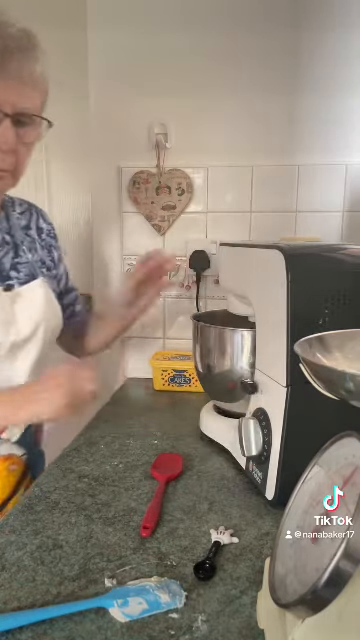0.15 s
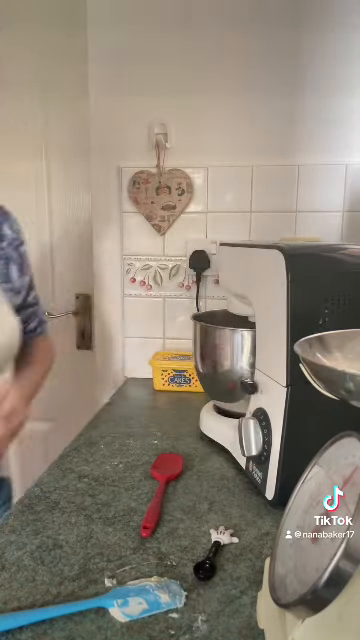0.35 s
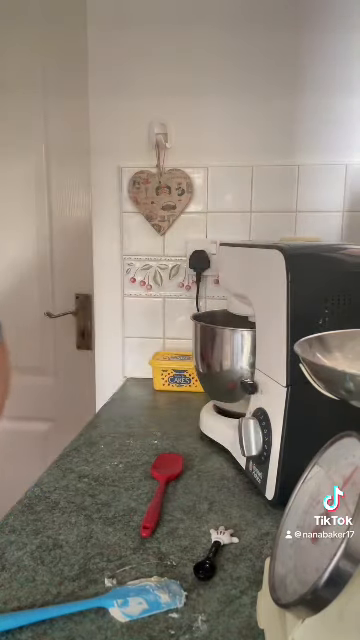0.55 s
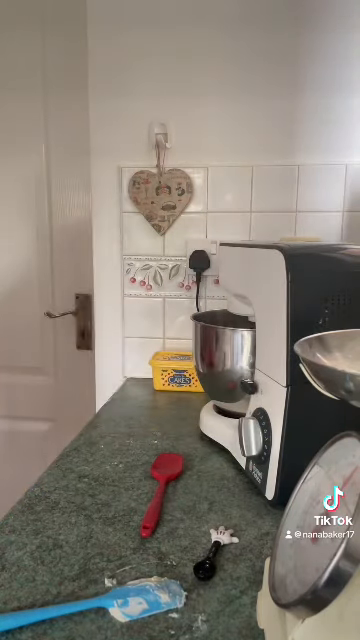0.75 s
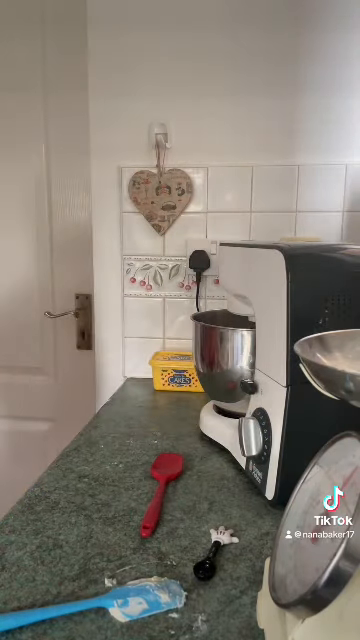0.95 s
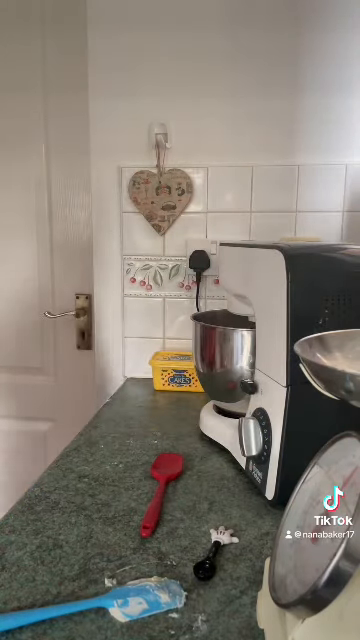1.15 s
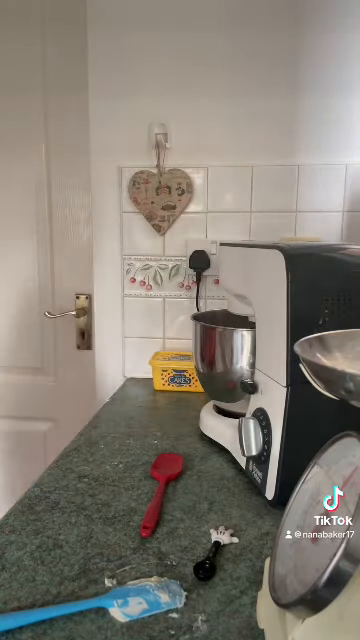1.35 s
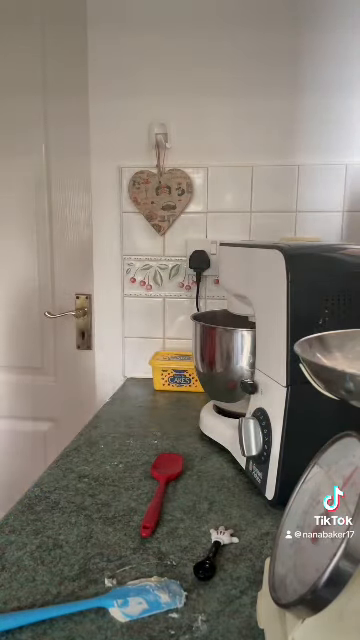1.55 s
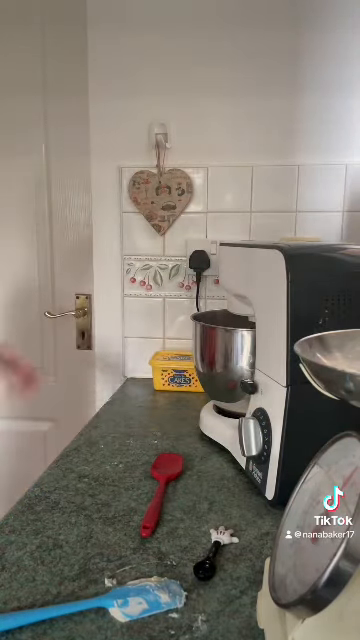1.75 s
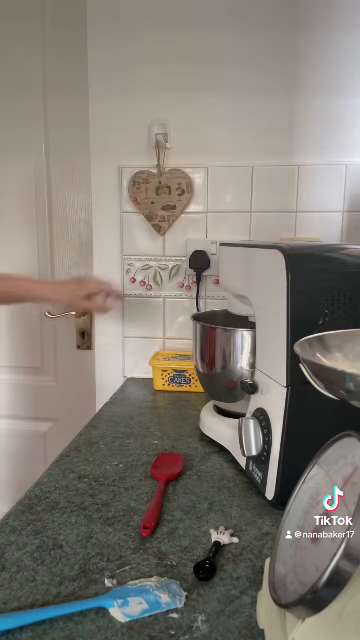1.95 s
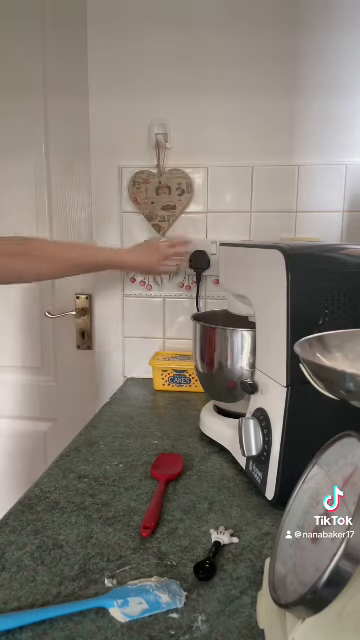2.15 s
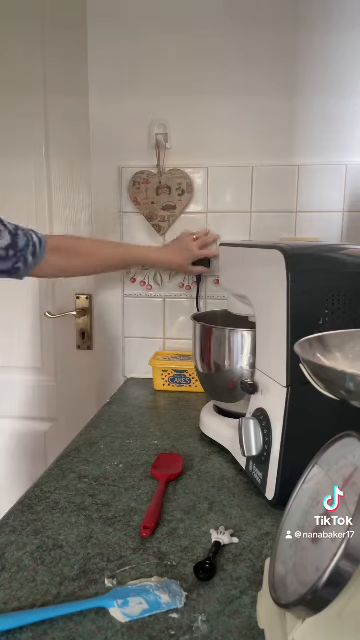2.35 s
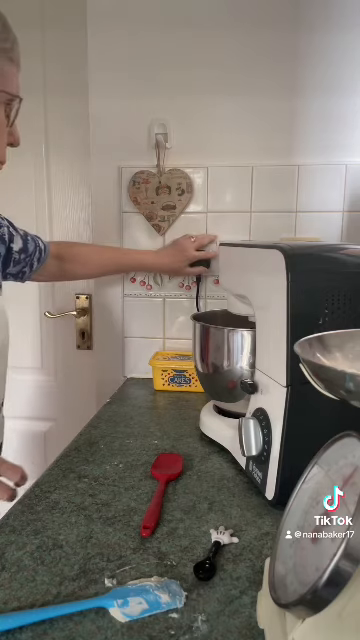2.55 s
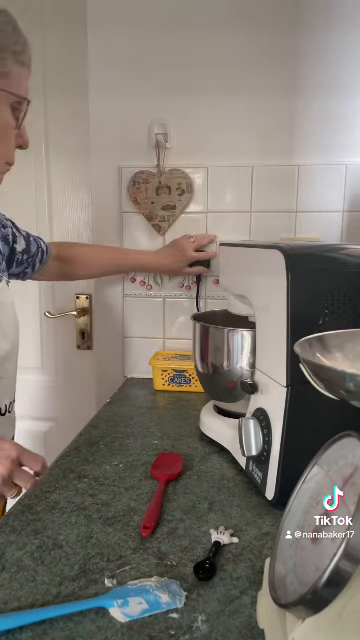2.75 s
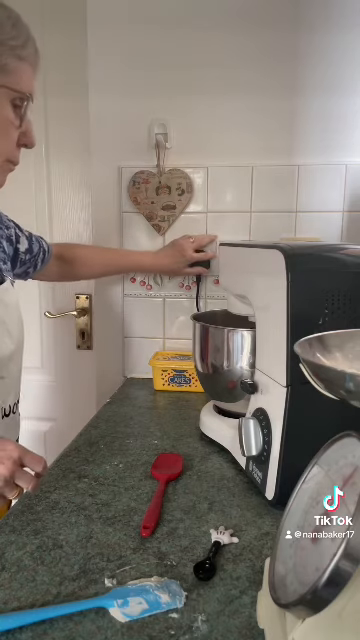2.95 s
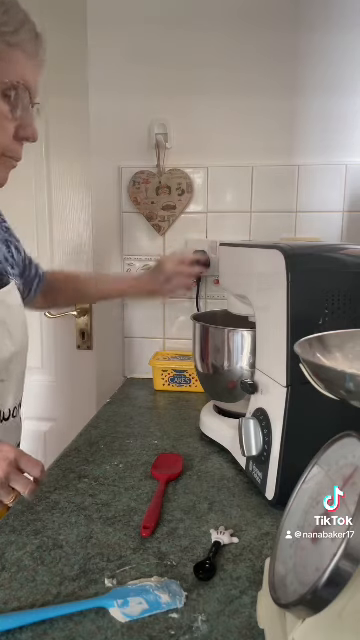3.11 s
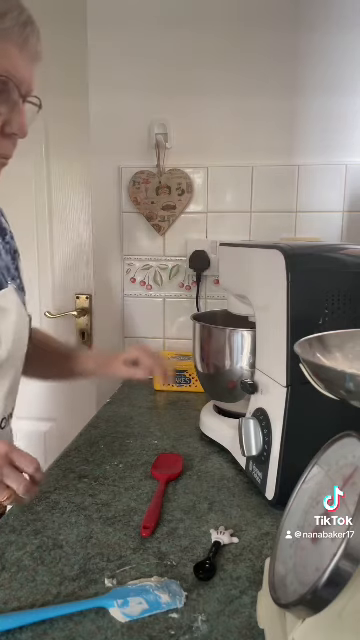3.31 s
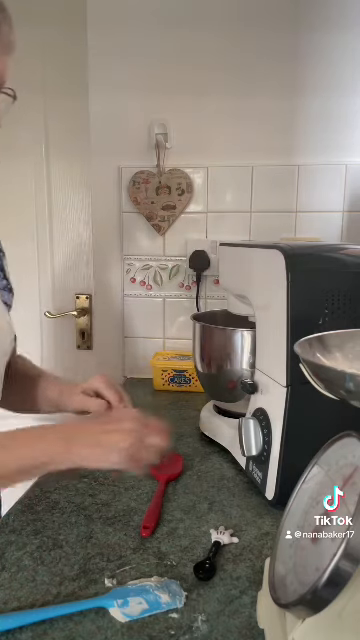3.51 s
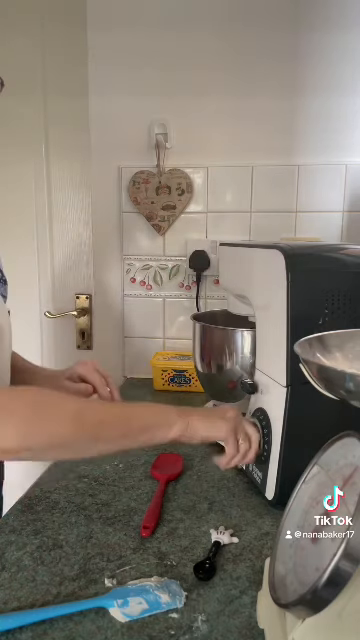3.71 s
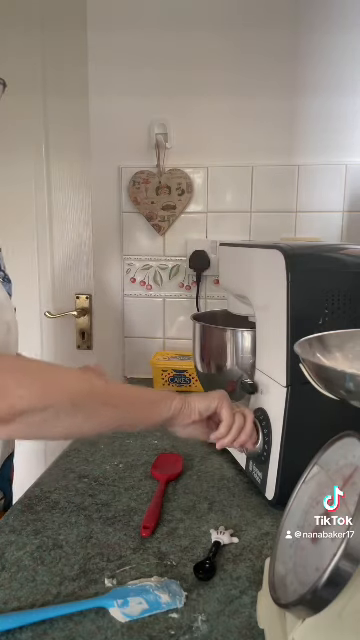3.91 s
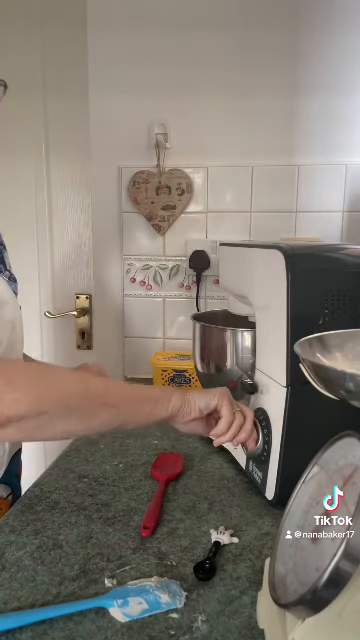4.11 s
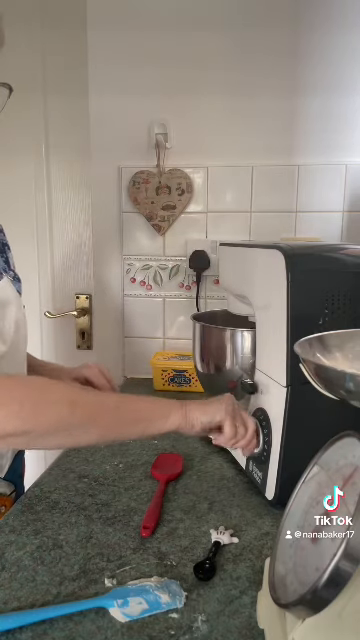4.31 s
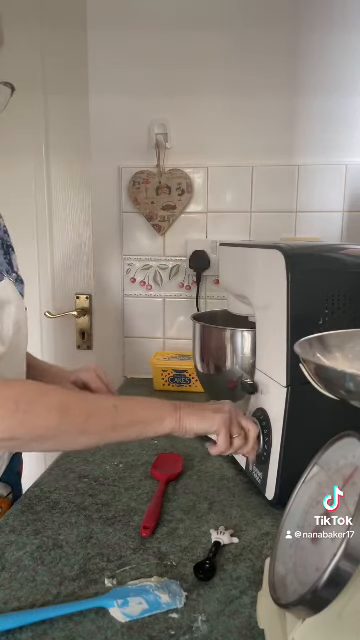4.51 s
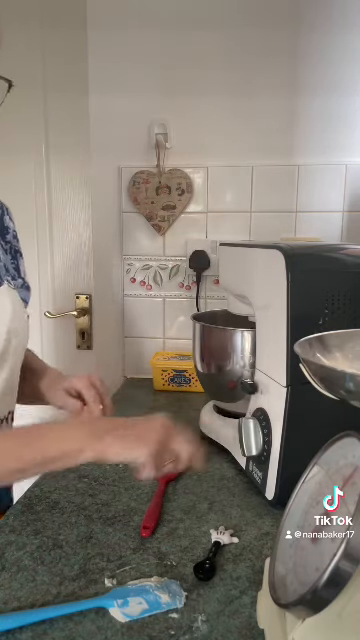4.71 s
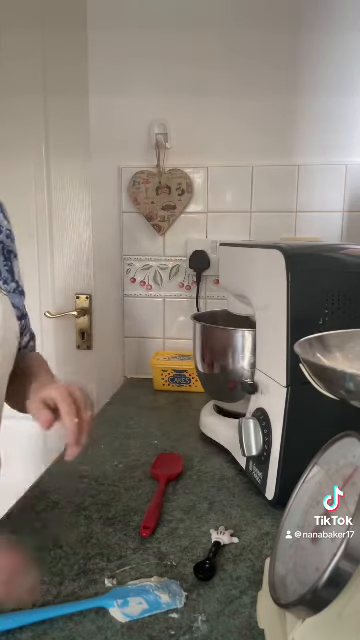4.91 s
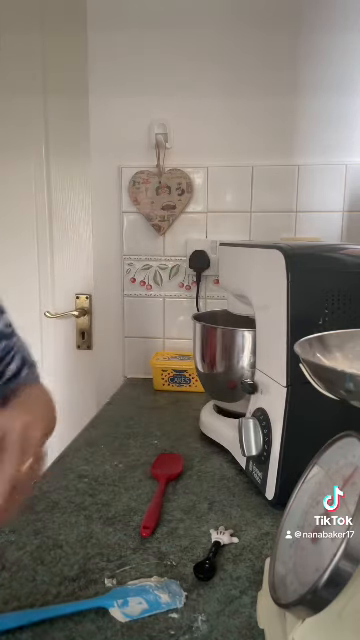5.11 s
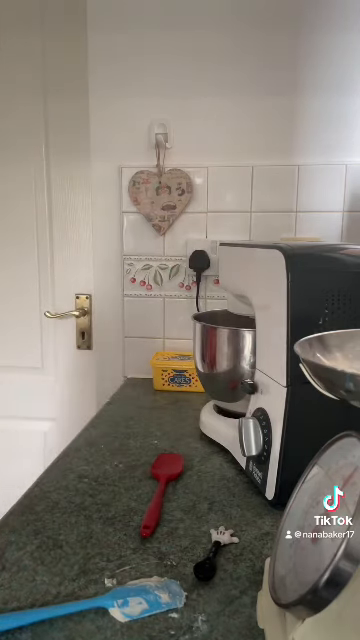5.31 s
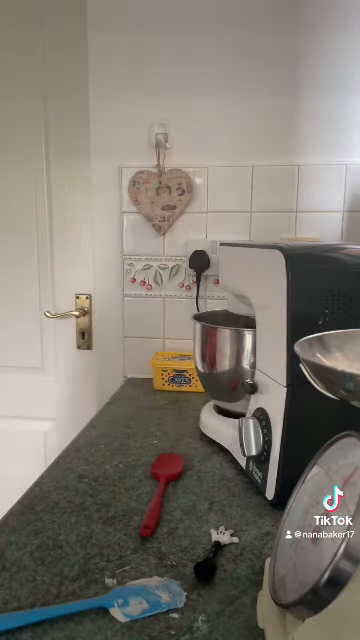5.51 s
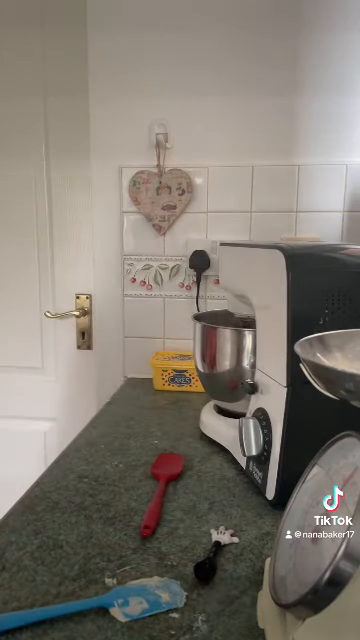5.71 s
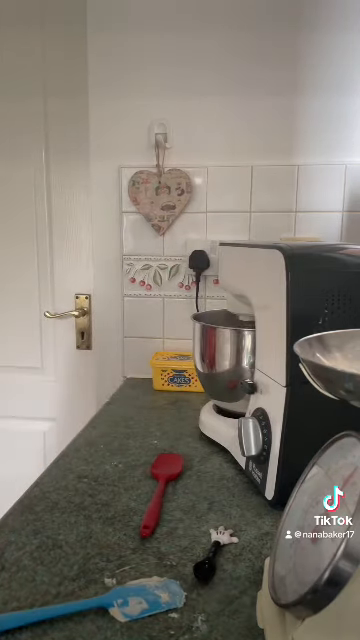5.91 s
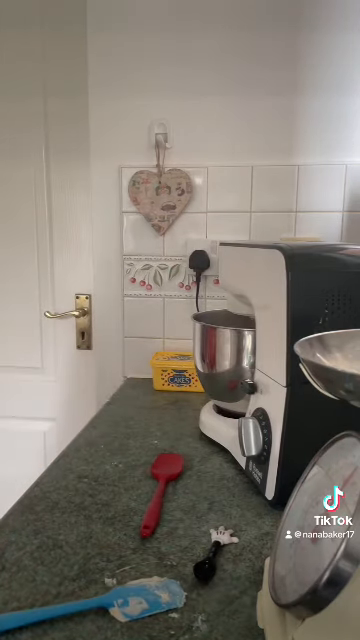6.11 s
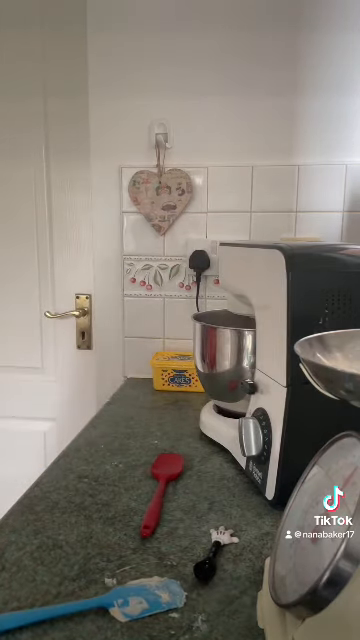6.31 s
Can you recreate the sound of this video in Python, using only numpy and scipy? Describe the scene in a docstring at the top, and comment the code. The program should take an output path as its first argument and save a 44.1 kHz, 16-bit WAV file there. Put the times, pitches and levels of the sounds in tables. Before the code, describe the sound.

Low, faintly rumbling room tone of a small tiled kitchen continues throughout. From 0 to 2.3 s, clothes rustle softly, slippers scuff and small knocks land, busiest around 0.3 to 1.5 s, then a light touch and knock near 2.05 s. Fingers slide over a plug at 2.5 s; at 2.76 s the wall socket snaps hard with a tiny bounce, bright and briefly ringing. A soft low thud follows at 3.1 s, with faint rustles and knocks. From 3.65 to 4.4 s a dial clicks unevenly round its detents with a short scrape. At 4.54 s the mixer starts with a knock and mains hum; gears clack, the shell booms and the whine climbs until about 5.25 s. It then runs steadily, whirring and grinding, with wet swishes strongest at 5.3 to 5.8 s, renewed gear strain after 6.1 s and two thin spits near 6.36 s, still running at the end.

```python
"""A stand mixer on a worktop in a small tiled kitchen, over low, steady room tone.
Clothes rustle, slippers scuff and things knock; fingers slide over the plug and the wall socket snaps on.
The speed dial clicks round its detents, then the motor starts with a mains hum.
As it gathers speed the gears clack, whirr and whine and the shell booms; the gearbox strains,
the beater swishes through filling in the steel bowl, and two wet spits come near the end."""
import sys
import numpy as np
from scipy import signal
from scipy.fft import rfft, irfft
from scipy.io import wavfile
from scipy.ndimage import uniform_filter1d

SR = 44100
rng = np.random.default_rng(int(sys.argv[2]) if len(sys.argv) > 2 else 0)


def waveform_to_disk(signal):
    """Save audio, clipped to [-1, 1], as 16-bit WAV at the path in sys.argv[1]."""
    frames = np.transpose(np.atleast_2d(signal))
    scaled = np.clip(frames, -1, 1) * 32767
    samples = np.round(scaled).astype(np.int16)
    wavfile.write(sys.argv[1], SR, samples)


N = 284709
TIME = np.arange(N) / SR  # s
FREQ = np.linspace(1e-3, SR / 2, 2049)  # Hz, the grid of every tone colour
MAINS_HZ = 50
MOTOR_ON_S = 4.535


def undb(db):
    """Decibels to gain."""
    return 10 ** (np.asarray(db) / 20)


def unit(x):
    """Scale to rms 1."""
    return x / np.sqrt(np.mean(x ** 2))


def walk(rate):
    """Smooth random wander with spread near 1, through about `rate` random points a second."""
    k = int(SR / rate)
    steps = np.repeat(rng.standard_normal(N // k + 1), k)
    return 1.18 * uniform_filter1d(steps, k)[:N]


def envelope(start, attack, hold, release):
    """Smooth rise, hold, then an exponential fall with this time constant (all in s)."""
    age = TIME - start
    rise = np.sin(np.pi / 2 * np.clip(age / attack, 0, 1)) ** 2
    return rise * np.exp(-np.maximum(age - attack - hold, 0) / release)


def resonance(hz, width, lift):
    """A bell-shaped lift in dB, as one mode of a body gives."""
    return lift / (1 + (2 * (FREQ - hz) / width) ** 2)


def body(colour, modes=()):
    """Gain in dB over frequency: a broad colour that falls away below its first point, lifted by resonances."""
    hz, db = np.transpose(colour)
    broad = np.interp(np.log(FREQ), np.log(hz), db)
    broad = broad - 12 * np.log2(hz[0] / FREQ).clip(0, 4)  # 12 dB an octave, for four octaves
    return broad + sum(resonance(*mode) for mode in modes)


def ring(x, db):
    """Pass x through the minimum-phase response with this gain, so that ringing only follows each contact."""
    cepstrum = irfft(np.log(undb(db)))
    # fold the cepstrum onto positive time to make the response causal
    cepstrum[len(db):] = 0
    cepstrum[1:len(db) - 1] *= 2
    return signal.fftconvolve(x, irfft(np.exp(rfft(cepstrum))))[:len(x)]


def kitchen(direct_db, t60):
    """Response of the tiled room: direct sound, uneven early echoes, then a dense tail whose treble dies sooner."""
    t = TIME[:SR // 2]
    early = np.exp(-t / 0.016)
    echoes = rng.standard_normal(len(t)) * undb(early * (3.8 * rng.standard_normal(len(t)) + 2.5))
    hz = np.arange(len(t) // 2 + 1) * SR / len(t)
    soft = irfft(rfft(echoes) / (1 + (hz / 9000) ** 4), len(t))
    treble = echoes - soft
    decay = np.exp(-np.log(1000) * t / t60)
    # a faint part of the sound lingers between the bare walls
    lingering = decay + undb(-23) * decay ** .5
    tail = unit(soft * lingering + treble * decay ** 1.28) / np.sqrt(len(t))
    tail[0] += undb(direct_db)
    # even out the room's broad colour, so that each source keeps its own; the fine ripple stays
    spectrum = rfft(tail)
    smooth_power = uniform_filter1d(np.abs(spectrum) ** 2, size=110)
    return irfft(spectrum / np.sqrt(smooth_power), len(t)) * np.linspace(1, 0, len(t)) ** .5


def strike(s, peak_db, gain_db, direct_db, t60):
    """One blow on a body, heard through the room; its loudest 5 ms sets the level."""
    hit = ring(kitchen(direct_db, t60), gain_db)
    hit *= undb(peak_db) / np.sqrt(uniform_filter1d(hit ** 2, SR // 200).max())
    return np.pad(hit, (int(s * SR), N))[:N]


def blows(table, gain_db, low_hz, high_hz, body_db, treble_db, direct_db, t60, ring_share=0):
    """Each blow has its own weight of bass and treble and may wake one resonance most."""
    low = 1 / (1 + (FREQ / low_hz) ** 4)
    high = 1 / (1 + (high_hz / FREQ) ** 6)
    out = 0
    for s, db, bass, top, *note in table:
        tone = low * (bass + body_db) + high * (top + treble_db)
        if note:
            hz, lift = note
            tone = tone + resonance(hz, ring_share * hz, lift)
        out = out + strike(s, db, gain_db + tone, direct_db, t60)
    return out


def grains(spread_db):
    """Dense tiny contacts of very uneven size, smeared by the room."""
    sizes = undb(spread_db * np.minimum(rng.exponential(size=N), 6))
    contacts = rng.standard_normal(N) * sizes
    return unit(signal.fftconvolve(contacts, kitchen(direct_db=-4, t60=0.25))[:N])


def powered():
    """The current comes on almost at once, over 18 ms."""
    return np.clip((TIME - MOTOR_ON_S) / 0.018, 0, 1)


def shaft_speed():
    """Turns a second as the motor runs up and settles."""
    # Each row: time in seconds, shaft speed in turns a second.
    shaft_points = [(4.54, 12), (4.75, 42), (5.0, 63), (5.25, 75), (5.6, 76), (6.1, 75.6), (6.46, 74.6)]
    return np.interp(TIME, *np.transpose(shaft_points))


def driven(full_db, halving_db):
    """Gain of a part that starts with the motor: full_db at top speed, halving_db less per halving of speed."""
    speed = shaft_speed()
    return undb(full_db + halving_db * np.log2(speed / speed.max())) * powered()


def room_tone():
    """Steady noise, coloured by the kitchen's resonances and wandering slightly in level."""
    # Broad colour of the room. Each row: frequency in Hz, gain in dB.
    room_colour = [(25, -20), (45, -5.5), (110, -3.5), (160, -1), (290, -5.5), (400, -13), (620, -15.5),
                   (730, -22), (1100, -21.5), (2000, -24.5), (4000, -30), (6500, -28), (8800, -26),
                   (11000, -31), (14000, -19.5), (15500, -22.5)]
    # Resonances of the room. Each row: frequency in Hz, width in Hz, lift in dB.
    room_modes = [(73, 14, 5), (113, 13.5, 10.5), (211, 78, 3.5), (858, 85, 9.5), (1292, 18, 13.5),
                  (1560, 49, 8.5)]
    air = unit(ring(rng.standard_normal(N), body(room_colour, room_modes)))
    return air * undb(-50.5 + .5 * walk(6.23))


def rubbing():
    """Uneven tiny contacts: cloth hisses lightly, slippers scuff lower, and fingers slide over the plug."""
    # Colours of cloth, of scuffing soles and of fingers on the plug. Each row: frequency in Hz, gain in dB.
    rustle_colour = [(2500, -17.5), (4200, -17), (7000, -12), (8900, -4), (10800, -13.5), (12200, -11),
                     (13800, -0.5), (15500, -7)]
    scuff_colour = [(200, -8.5), (500, -1.5), (900, 3), (1400, -0.5), (2500, 1), (4500, -2.5), (8000, 0.5),
                    (10500, -18), (15000, -1.5)]
    slide_colour = [(500, -16), (1300, -18), (2400, -9), (5000, -4.5), (8200, -4), (11000, -17),
                    (13600, -12), (15500, -11.5)]
    # Slow swishes of clothing. Each row: start in seconds, length before the fall in seconds, level in dB.
    rustles = [(0.0, 0.0071, -50), (0.122, 0.38, -51.5), (0.465, 0.16, -38.5), (0.55, 0.49, -42),
               (1.08, 0.13, -44.5), (1.438, 0.48, -50.5), (1.947, 0.22, -54.5), (2.236, 0.072, -48.5),
               (2.96, 0.017, -60), (3.363, 0.29, -57), (3.632, 0.028, -45), (4.46, 0.098, -54.5)]
    # Short scuffs of slippers and sleeves. Each row: start in seconds, scuff level in dB, hiss level in dB.
    scuffs = [(0.458, -38.5, -52), (0.927, -34, -39), (1.055, -42.5, -59), (1.261, -41.5, -33),
              (1.444, -47.5, -43), (1.53, -53.5, -54), (1.69, -56.5, -60), (1.785, -58, -77),
              (2.122, -47, -46), (3.088, -53.5, -56), (3.245, -48, -44), (3.675, -54, -64)]
    rustle = unit(ring(grains(spread_db=2), body(rustle_colour))) * undb(1.0 * walk(45.84))
    scuff = unit(ring(grains(spread_db=5.0), body(scuff_colour))) * undb(0.5 * walk(60))
    slide = unit(ring(grains(spread_db=5.5), body(slide_colour)))

    rise_share = 0.59  # part of each swish spent swelling
    swells = sum(undb(db) * envelope(s, rise_share * length, (1 - rise_share) * length, release=0.076)
                 for s, length, db in rustles)
    cloth = swells * (rustle + undb(-11.5) * scuff)

    steps = 0
    for s, scuff_db, hiss_db in scuffs:
        step = undb(scuff_db) * scuff + undb(hiss_db) * rustle
        steps = steps + step * envelope(s, attack=0.05, hold=0.0068, release=0.04)

    plug = undb(-36.5) * (slide + undb(-4) * rustle)
    plug = plug * envelope(2.472, attack=0.03, hold=0.036, release=0.033)
    return cloth + steps + plug


def knocks():
    """Soft knocks of handling, each with its own ring; some are a light touch and then a knock."""
    # Each row: time in seconds, peak level in dB before the trim, extra body in dB, extra treble in dB,
    # ring frequency in Hz, ring lift in dB.
    knock_hits = [(0.308, -37.5, -2.5, -3.5, 530, 9), (0.322, -38.5, -8, -3, 814, 11),
                  (0.885, -36.5, -6.5, -28, 2350, 7), (0.893, -35, -10, -8, 1520, 6),
                  (0.965, -27.5, -12, -3.5, 2770, 1.5), (0.974, -38, 0, -12, 1150, 9),
                  (1.085, -32.5, -27, 4.5, 2020, 1), (1.469, -37, -30, 13, 1500, -6),
                  (2.046, -46, -3, 1, 894, 21), (2.056, -37.5, 0, 2.5, 890, 14),
                  (2.139, -42.5, -23, -5, 1540, 8), (3.163, -44.5, -7, 5, 845, 12),
                  (3.488, -36.5, -2, 7.5, 1570, 8), (4.539, -35, 0, -5, 525, 18),
                  (4.551, -31.5, 7, -2, 511, 14)]
    # Colour common to the knocks. Each row: frequency in Hz, gain in dB.
    knock_colour = [(60, -31), (200, -9.5), (500, -1.5), (900, 0), (1800, 1.5), (3000, -0.5), (5000, -7.5),
                    (8500, -6), (11000, -18), (14000, -7.5)]
    trim = undb(-0.5)
    return trim * blows(knock_hits, body(knock_colour), low_hz=824, high_hz=4000, body_db=9, treble_db=2.0,
                        ring_share=0.24, direct_db=-10, t60=0.3)


def thud():
    """A soft low thud swells in the room: one sine with a wandering phase."""
    tone = np.sqrt(2) * np.sin(2 * np.pi * 114 * TIME + 0.7 * walk(20))  # 114 Hz
    return tone * undb(-46) * envelope(3.125, attack=0.045, hold=0.037, release=0.046)


def socket_switch():
    """The socket's rocker snaps over and bounces, ringing its plate."""
    # Each row: time in seconds, peak level in dB before the trim.
    snaps = [(2.7621, -10.5), (2.7697, -13.5)]
    # Colour of the snap. Each row: frequency in Hz, gain in dB.
    switch_colour = [(150, -37), (250, -26), (544, -32), (681, -25), (1430, -17.5), (1730, -27.5),
                     (2280, -10.5), (2760, -24), (3330, -13.5), (4170, -15), (7000, -3), (9230, -4.5),
                     (10200, -17.5), (14000, -7.5), (15500, -9)]
    # Resonances and dips of the switch. Each row: frequency in Hz, width in Hz, lift in dB.
    switch_modes = [(1400, 140, 0.5), (2300, 150, -1.5), (3180, 250, 7), (4490, 180, 8.5), (6200, 80, -11),
                    (6560, 59, -7), (6950, 110, 6), (8080, 130, 10), (8200, 180, -4), (14100, 400, 10)]
    gain_db = body(switch_colour, switch_modes)
    trim = undb(1.9)
    return trim * sum(strike(s, db, gain_db, direct_db=-17, t60=0.23) for s, db in snaps)


def speed_dial():
    """The dial clicks over its detents and scrapes between them, both ringing the same modes."""
    # Each row: time in seconds, peak level in dB before the trim, extra body in dB, extra treble in dB,
    # ring frequency in Hz, ring lift in dB.
    detents = [(3.6645, -33.5, -4, -2.5, 4520, 12.5), (3.7125, -37, -8, -31, 1096, 12.5),
               (3.8196, -24, -10.5, -1.5, 1500, -3), (3.9776, -26.5, -14.5, -14, 4750, 9),
               (4.0196, -27.5, -11.5, -13, 6950, 16.5), (4.1165, -25.5, -12.5, -10.5, 5400, 2),
               (4.1912, -37, -8, -17, 4680, 5), (4.2858, -28, -8.5, 0.5, 6930, 2),
               (4.398, -52.5, -9, -29, 4420, 13)]
    # Colours of the clicks and of the scrape. Each row: frequency in Hz, gain in dB.
    dial_colour = [(250, -2), (600, -8.5), (1100, -7), (1900, -12), (2500, -9.5), (3800, -6.5), (5200, -4),
                   (6300, -6.5), (7500, -6.5), (9300, -1.5), (10800, -8.5), (13000, -3), (14500, 5.5),
                   (15500, -5)]
    twist_colour = [(300, 0.5), (1500, 0), (2600, -8), (5000, -4.5), (9000, -11.5), (15000, -26)]
    # Resonances of the dial. Each row: frequency in Hz, width in Hz, lift in dB.
    dial_modes = [(1090, 100, 3), (1520, 100, 8.5), (2010, 210, 6.5), (3150, 150, 7), (4630, 300, 5.5),
                  (5500, 200, 2), (7000, 200, 0), (8340, 270, 5), (9300, 250, 2.5)]
    trim = undb(-0.8)
    clicks = trim * blows(detents, body(dial_colour, dial_modes), low_hz=2440, high_hz=9900, body_db=12.5,
                          treble_db=6.0, ring_share=0.043, direct_db=-13, t60=0.24)
    scrape = unit(ring(grains(spread_db=4.5), body(twist_colour, dial_modes)))
    twist = scrape * undb(-38) * envelope(3.84, attack=0.037, hold=0.018, release=0.03)
    return clicks + twist


def hum():
    """Chopped mains current shakes the motor's iron at multiples of the mains; the lines waver in level."""
    # Mains lines. Each row: frequency in Hz, mean level in dB relative to the hum.
    hum_lines = [(100, -23), (150, -16), (200, 3), (250, -19), (300, -17), (400, -19), (450, -22.5),
                 (500, -22), (600, -18.5), (700, -24)]
    # Level of the whole hum. Each row: time in seconds, level in dB before the trim.
    hum_level = [(4.56, -37.5), (4.606, -34.5), (4.89, -28), (4.98, -34.5), (5.08, -30.5), (5.112, -43),
                 (5.148, -35), (5.212, -38), (5.254, -27), (5.302, -30), (5.418, -42.5), (5.696, -33.5),
                 (6.37, -33), (6.45, -38)]
    phase = 2 * np.pi * MAINS_HZ * TIME + 0.013 * walk(11.0)
    lines = 0
    for hz, db in hum_lines:
        depth = abs(db) / 10
        waver_db = (2.5 + depth) * min(depth, 1) * walk(8)
        line = np.sin(round(hz / MAINS_HZ) * phase + rng.uniform(0, 2 * np.pi))
        lines = lines + undb(db + waver_db) * line
    trim_db = 0.5
    return undb(trim_db + np.interp(TIME, *np.transpose(hum_level))) * lines * powered()


def housing():
    """The whole machine rumbles on the worktop, and its shell booms as the speed sweeps through it."""
    # Colours of the rumble and of the boom. Each row: frequency in Hz, gain in dB.
    rumble_colour = [(25, -14), (40, -14), (52, 2), (75, 0), (88, -20), (112, 4), (140, -3), (190, 3.5),
                     (260, -9), (500, -37)]
    boom_colour = [(200, -37), (310, -1), (385, 0.5), (450, -6.5), (700, -24), (2000, -56)]
    # Each row: start in seconds, boom level in dB, clean note level in dB, added rumble level in dB.
    boom_times = [(4.8, -39.5, -45, -52), (4.879, -32.5, -46, -43), (4.97, -37, -54, -51),
                  (5.105, -37, -30.5, -49), (5.185, -37, -39.5, -39)]
    rumble = unit(ring(grains(spread_db=5.0), body(rumble_colour)))
    boom = unit(ring(grains(spread_db=2.5), body(boom_colour)))
    note = unit(np.sin(2 * np.pi * 392.5 * TIME + 0.4 * walk(20)))  # 392.5 Hz
    booms = 0
    for s, boom_db, note_db, rumble_db in boom_times:
        mix = undb(boom_db) * boom + undb(note_db) * note + undb(rumble_db) * rumble
        booms = booms + mix * envelope(s, attack=0.025, hold=0.029, release=0.039)
    return rumble * driven(full_db=-42.5, halving_db=17) + booms


def gears():
    """Teeth whirr and grind in pulses each turn, whine at pitches that rise with the speed, and clack while slack."""
    # Colours of the whirr, the grind, the bearing's rasp and the clacks. Each row: frequency in Hz, gain in dB.
    gear_colour = [(230, -4.5), (320, -8), (520, -3.5), (750, -9.5), (870, -11.5), (950, -3), (1050, -9.5),
                   (1800, -13.5), (2350, -17), (3700, -21.5), (4050, -24.5), (4800, -22.5), (8800, -22.5),
                   (11000, -35)]
    grind_colour = [(900, -18), (1200, -0.5), (1750, 5.5), (2050, 5), (2350, -13), (2700, -13), (3200, -30),
                    (8000, -36)]
    rasp_colour = [(2400, -25), (3100, 0.5), (3400, 2), (3750, -1), (3950, -16), (6000, -24)]
    clack_colour = [(300, -9), (900, 10), (2000, 3.5), (3400, 2.5), (4300, -9), (6200, 1.5), (9000, -0.5),
                    (11000, -19), (14500, -8)]
    # Resonances of the gear case. Each row: frequency in Hz, width in Hz, lift in dB.
    case_modes = [(396, 63, 3), (821, 32, 8.5), (915, 56, 4.5), (1256, 34, 0.5), (2770, 130, 5.5),
                  (3580, 250, 0.5), (4900, 120, 0), (5530, 200, 2.5), (6250, 210, 9), (7870, 230, 6)]
    # Lines of the whine. Each row: frequency in Hz at full speed, level in dB relative to the other lines.
    gear_lines = [(75.4, -49), (116, -44.5), (301.5, -44), (506, -50.5), (662, -50.5), (807, -48),
                  (904, -50), (980, -53), (1131, -55), (1238, -53), (1437, -54.5), (1685, -55), (1766, -57),
                  (1981, -59)]
    # The gearbox strains as the beater meets the filling.
    # Each row: start in seconds, grind level in dB, rasp level in dB.
    strains = [(5.2, -40, -48), (6.06, -47, -50), (6.19, -38, -71)]
    # Slack gears and beater clack during run-up.
    # Each row: time in seconds, peak level in dB before the trim, extra body in dB, extra treble in dB.
    clack_hits = [(4.559, -34.5, 0, -17), (4.699, -34, 7, -18), (4.743, -29, 9, -28), (4.779, -28, 1, -12),
                  (4.792, -33.5, 7, -12), (4.861, -32.5, -8, -16), (4.931, -28.5, -9, -6),
                  (4.939, -29.5, -2, -4), (4.981, -33, 9, -16), (5.218, -27, 1.5, -10)]

    speed = shaft_speed()
    turns = np.cumsum(speed * (1 + 0.0049 * walk(12))) / SR
    share = speed / speed.max()
    # the load on the teeth pulses with each turn and with each half-wave of the mains
    turn_db = 1.2 * np.cos(2 * np.pi * turns)
    mains_db = 0.32 * np.cos(2 * np.pi * 2 * MAINS_HZ * TIME)
    load = undb(turn_db + mains_db + 0.34 * walk(40))

    whirr = unit(ring(grains(spread_db=3.5) * load, body(gear_colour, case_modes)))
    # slow teeth meet softly, so the whirr brightens with speed
    dull = signal.sosfilt(signal.butter(1, 1100, fs=SR, output="sos"), whirr)
    whirr = dull + share ** 2 * (whirr - dull)

    # the pitches of the whine rise in step with the speed
    whine = 0
    for hz, db in gear_lines:
        line = np.sin(2 * np.pi * hz / speed.max() * turns + 1.06 * walk(24))
        whine = whine + undb(db + 3.2 * walk(12)) * line
    whine = unit(whine)

    grind_strain, rasp_strain = 0, 0
    for s, grind_db, rasp_db in strains:
        push = envelope(s, attack=0.06, hold=0.028, release=0.13)
        grind_strain = grind_strain + undb(grind_db) * push
        rasp_strain = rasp_strain + undb(rasp_db) * push
    # a bearing rasps for most of the run
    bearing = undb(-51) * envelope(4.74, attack=0.058, hold=1.35, release=0.05)
    grind = unit(ring(grains(spread_db=2.0) * load, body(grind_colour)))
    grind = grind * np.hypot(driven(full_db=-42.5, halving_db=24), grind_strain)
    rasp = unit(ring(grains(spread_db=2.5) * load, body(rasp_colour)))
    rasp = rasp * np.hypot(bearing, rasp_strain)

    trim = undb(-0.5)
    clacks = trim * blows(clack_hits, body(clack_colour, case_modes), low_hz=1500, high_hz=9800, body_db=2.5,
                          treble_db=18, direct_db=-12.0, t60=0.27)
    whirr = driven(full_db=-32, halving_db=3.3) * whirr
    whine = driven(full_db=-36, halving_db=17) * whine
    return whirr + whine + grind + rasp + clacks


def beater():
    """Wet filling crackles and swishes as uneven grains and spits against the bowl as short blows."""
    # Colours of the swish and of the spits. Each row: frequency in Hz, gain in dB.
    swish_colour = [(2500, -19), (5000, -2.5), (7000, -5), (9000, 0), (10700, -10), (12000, -1.5),
                    (14000, 6.5), (15500, -0.5)]
    squelch_colour = [(5000, -25), (6200, -4), (8000, -16), (9500, -5), (11000, -8), (13000, -3),
                      (15000, -2.5)]
    # The beater throws filling round the bowl. Each row: start in seconds, level in dB.
    throw_times = [(5.3, -35), (5.455, -36), (5.645, -38), (5.73, -44)]
    # Thin wet spits. Each row: time in seconds, peak level in dB.
    squelches = [(6.355, -28.5), (6.384, -28)]
    swish = unit(ring(grains(spread_db=5.5), body(swish_colour))) * undb(1.1 * walk(25))
    throws = sum(undb(db) * envelope(s, attack=0.065, hold=0.015, release=0.064) for s, db in throw_times)
    spits = sum(strike(s, db, body(squelch_colour), direct_db=-2, t60=0.052) for s, db in squelches)
    return swish * np.hypot(driven(full_db=-40, halving_db=18), throws) + spits


def scene():
    """All sources over the kitchen's low, steady background, as one channel."""
    handling = rubbing() + knocks() + thud() + socket_switch() + speed_dial()
    mixer = hum() + housing() + gears() + beater()
    return (room_tone() + handling + mixer)[None]


def record(dry):
    """Soft saturation rounds the sharpest peaks, and a steep low-pass cuts the highest treble."""
    rounded = .9 * np.tanh(dry / .9)
    top_hz = 15850
    return signal.sosfilt(signal.ellip(12, .2, 80, top_hz, fs=SR, output="sos"), rounded)


dry = scene()
out = record(dry)
waveform_to_disk(out)
```